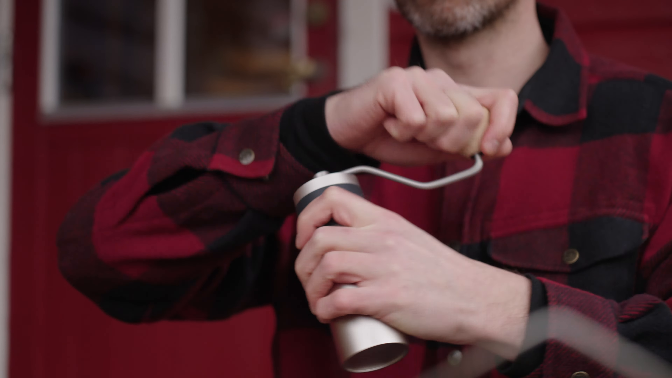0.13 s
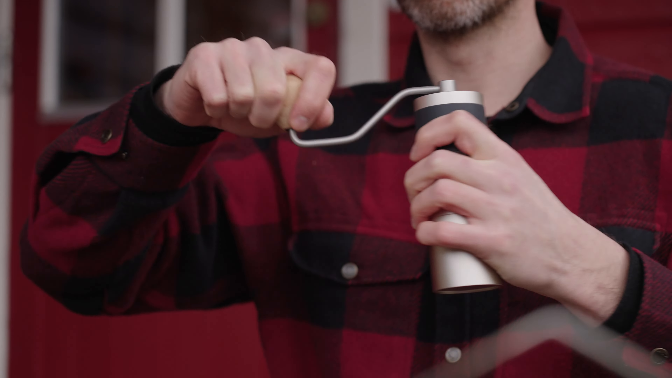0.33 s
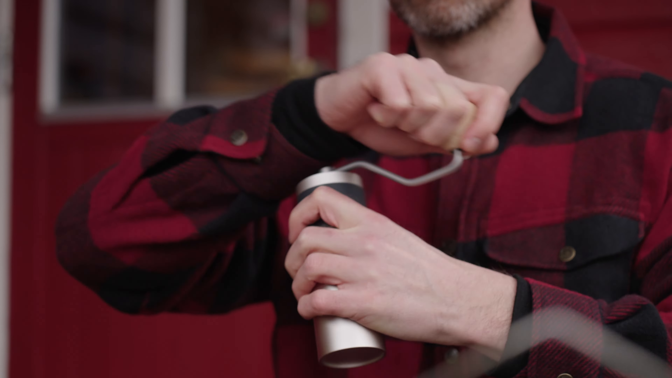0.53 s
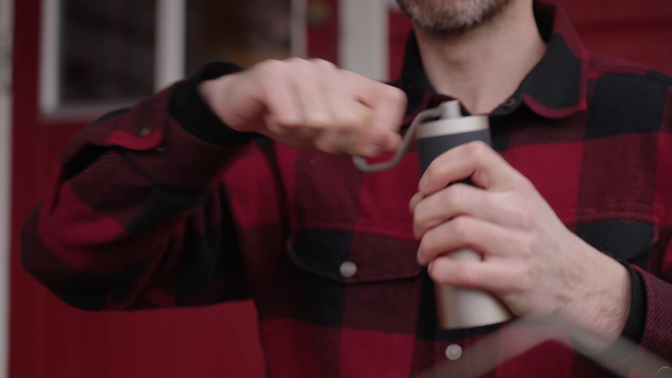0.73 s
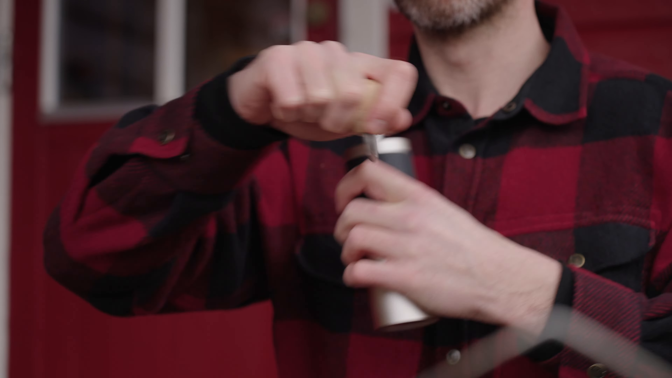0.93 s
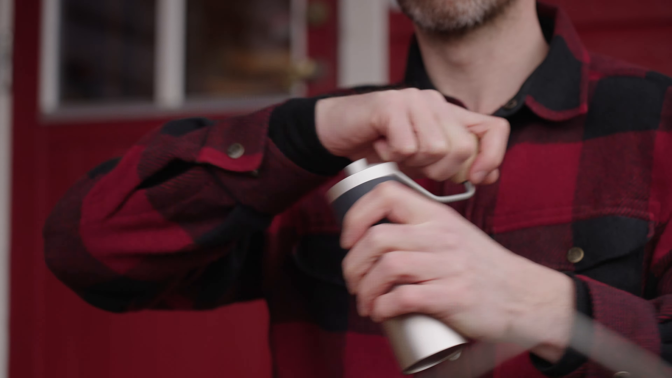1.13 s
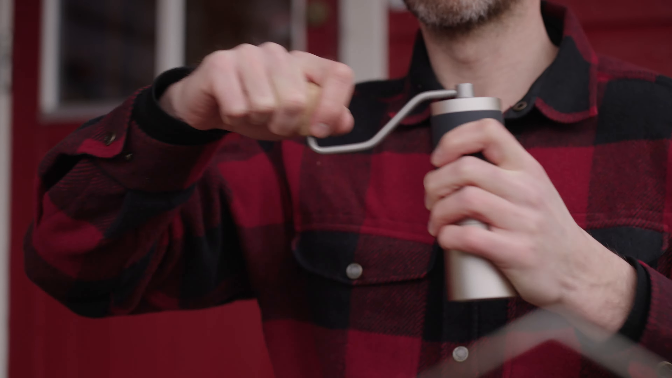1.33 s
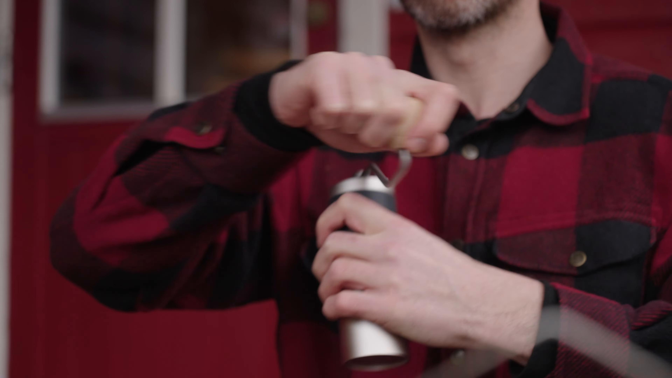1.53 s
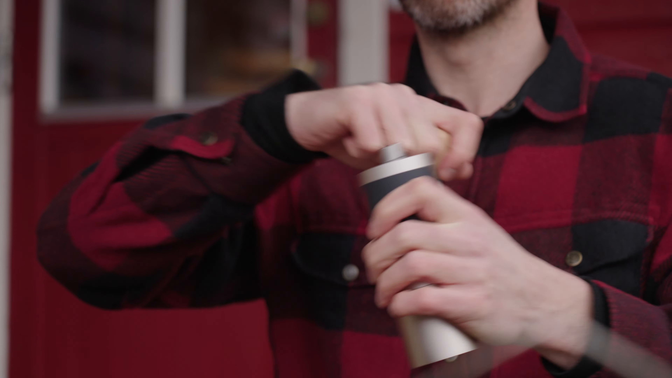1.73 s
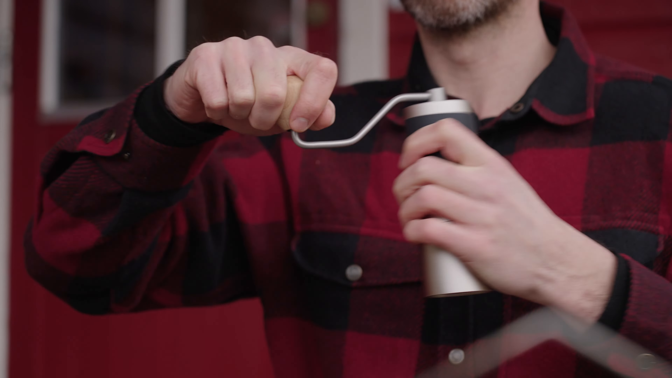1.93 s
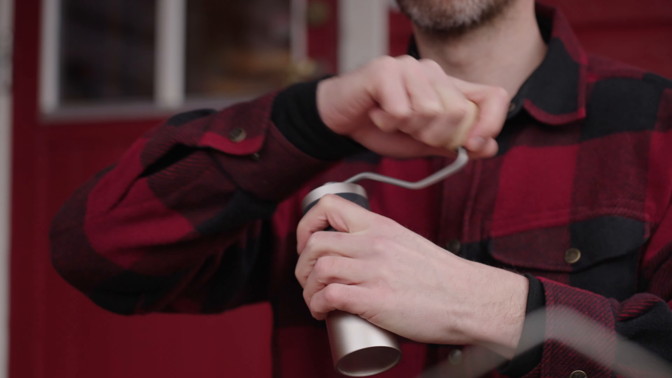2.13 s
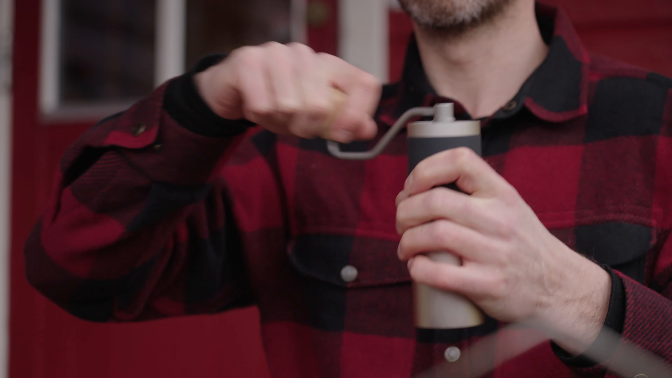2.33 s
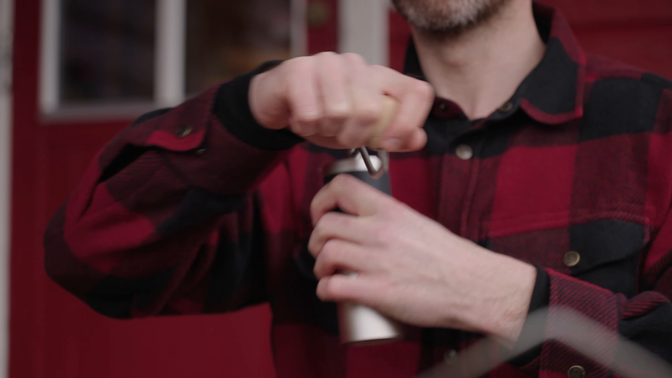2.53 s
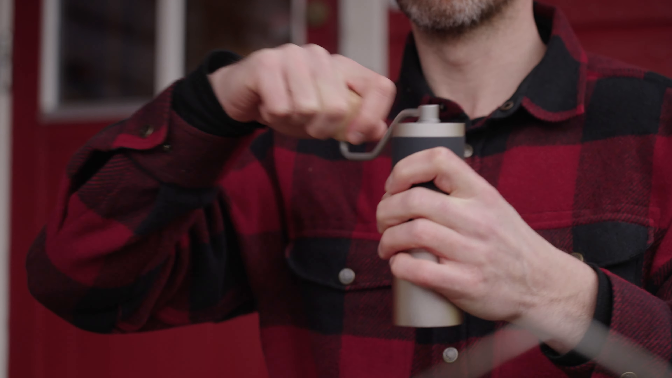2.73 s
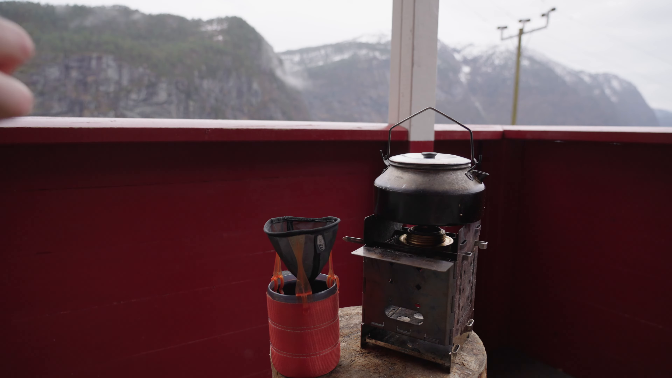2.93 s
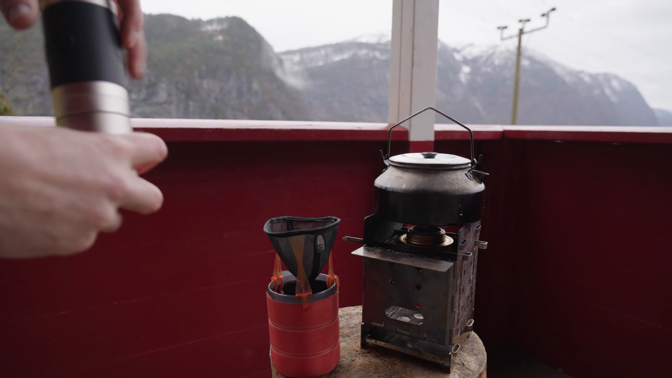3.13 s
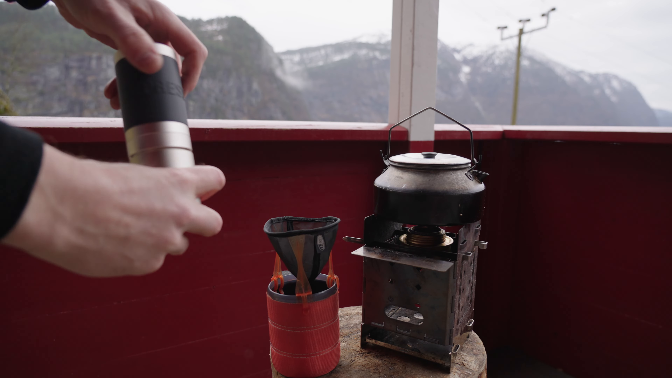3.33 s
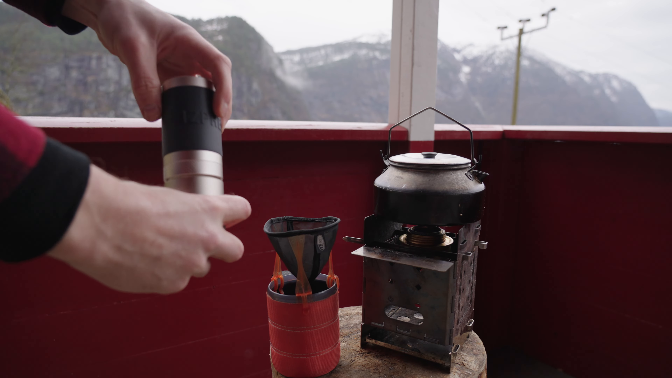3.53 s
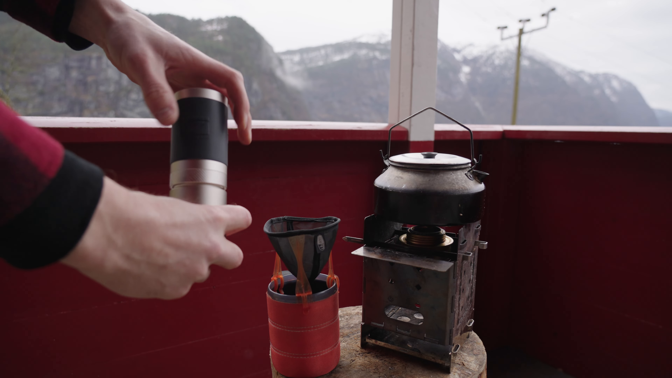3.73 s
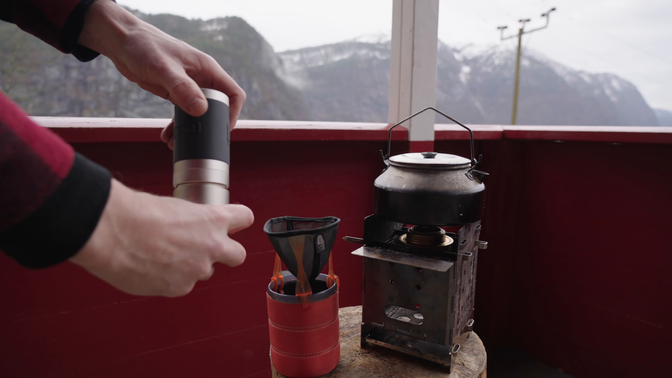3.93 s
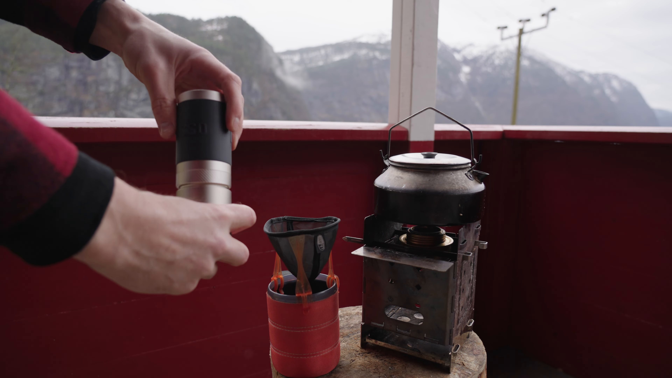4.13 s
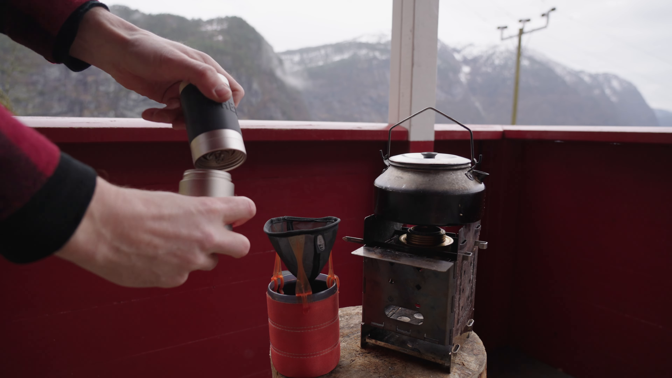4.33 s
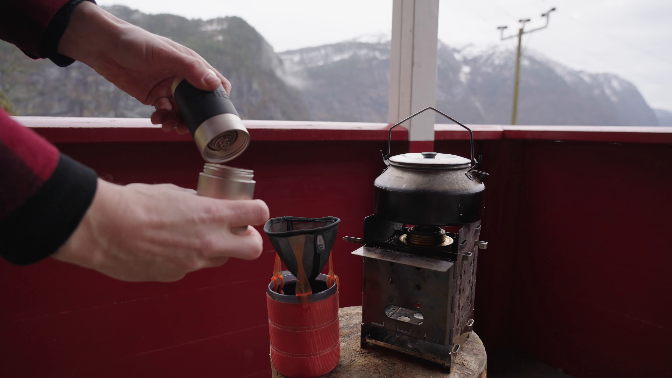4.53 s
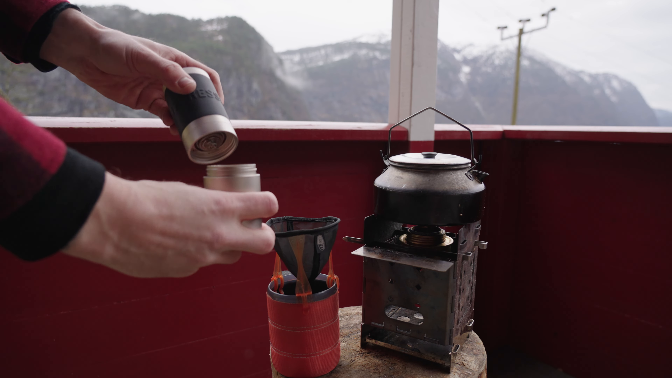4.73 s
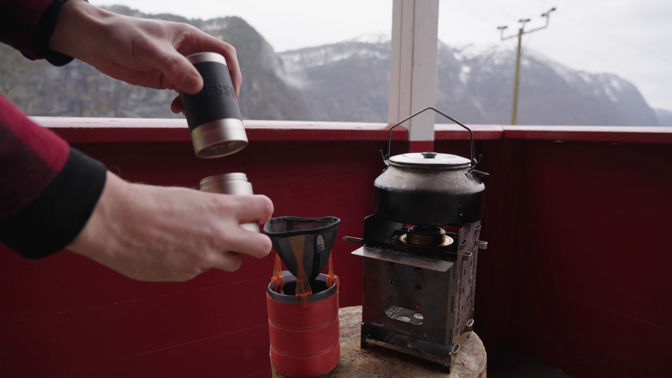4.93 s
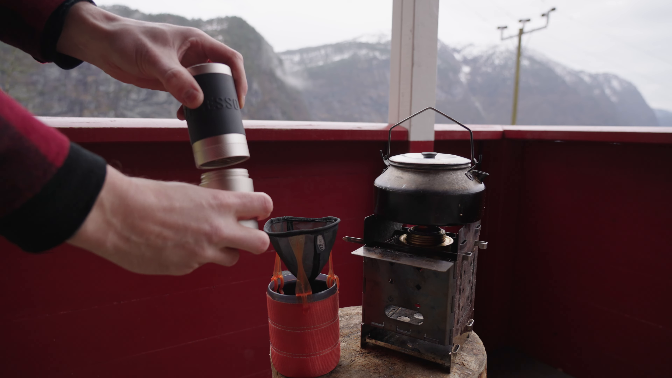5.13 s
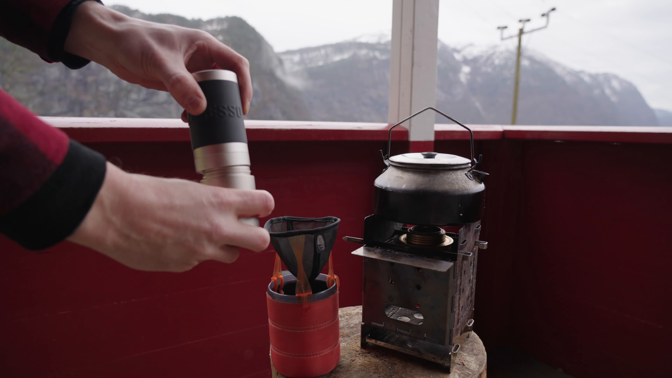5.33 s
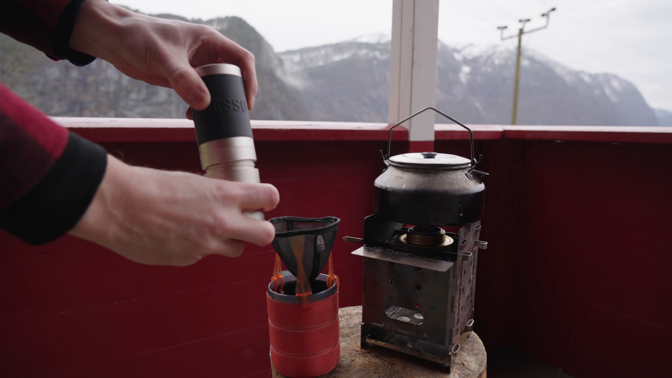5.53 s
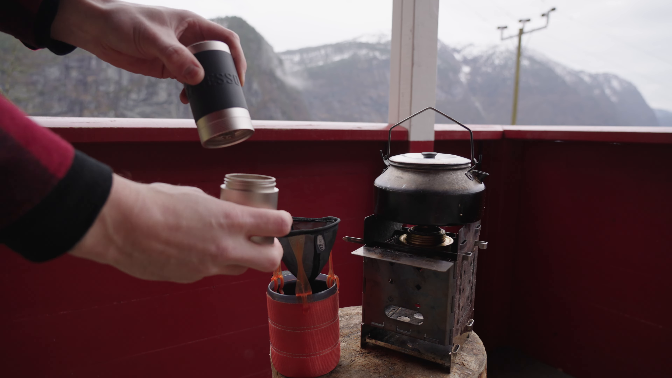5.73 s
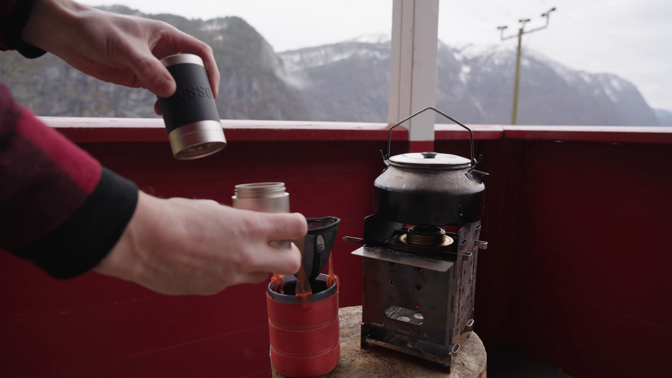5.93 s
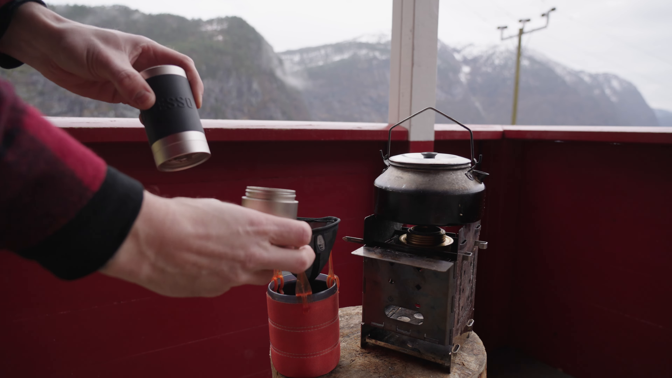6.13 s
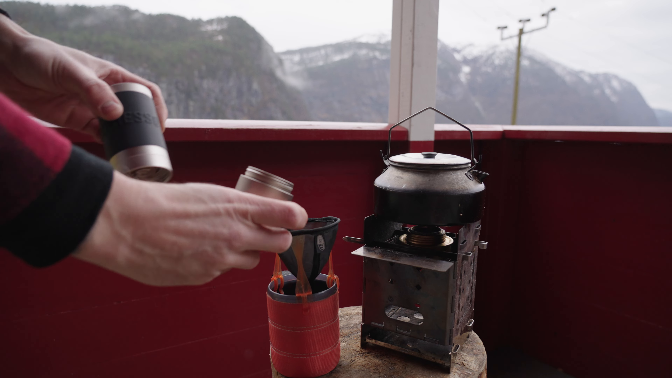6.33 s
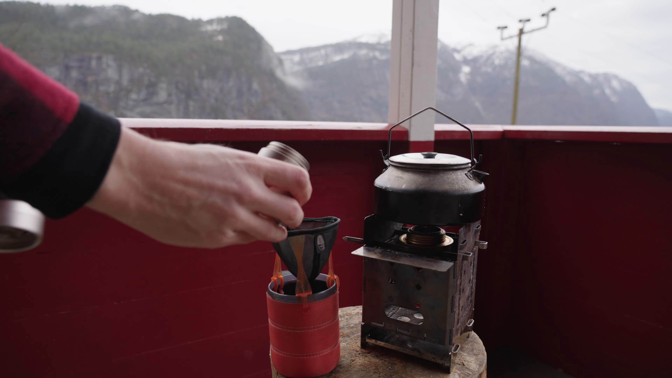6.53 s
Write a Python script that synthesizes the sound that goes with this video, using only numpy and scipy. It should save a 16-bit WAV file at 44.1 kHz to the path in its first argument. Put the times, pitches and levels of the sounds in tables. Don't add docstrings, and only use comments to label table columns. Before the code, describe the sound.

Crisp coffee beans splinter in a hand grinder, cut to ringing metallic thread squeaks, a few ticks, then sharp metal knocks over soft wind.

```python
import sys
import numpy as np
from scipy import signal
from scipy.fft import rfft, irfft
from scipy.io import wavfile
from scipy.ndimage import uniform_filter1d

SR = 44100
rng = np.random.default_rng(int(sys.argv[2]) if len(sys.argv) > 2 else 0)


def rack_gain(trim_db):
    fader = np.asarray(trim_db, float)
    return 10 ** (fader / 20)


def generate_wav(sig):
    pcm = np.round(np.clip(np.atleast_2d(sig).T, -1, 1) * 32767).astype(np.int16)
    wavfile.write(sys.argv[1], SR, pcm)


N = 295462
CHANGE_S = 2.887

# frequency in Hz, density in dB per Hz.
AIR_SPECTRUM = [(35, -25), (65, -16.5), (138, -1), (228, -7.5), (357, -5.5), (780, -10), (5000, -33),
                (16000, -45)]
# time in seconds, level in dB.
WIND = [
    (2.89, 2.5),
    (3.8, 1.5),
    (4.7, -1),
    (5.9, -1),
    (6.35, 0),
    (6.7, 0.5),
]
# time in seconds, level in dB.
MOTOR_HUM = [
    (0.0, -71.5),
    (.9, -63),
    (1.36, -72),
    (1.45, -64.5),
    (2.54, -60.5),
    (2.88, -71),
]

# start in seconds, held in seconds, load in dB, brittleness in dB.
BEANS = [(0, 0.013, -49, -6), (.05, 0.017, -50, 6.5), (.16, .03, -48.5, -1), (0.198, 0.11, -42.5, 0),
         (.33, 0.097, -48.5, 0.5), (.43, 0.035, -44, 2.5), (.52, 0.066, -46.5, 0), (.61, 0.097, -45, -2),
         (.74, .05, -52, 5), (.865, .03, -49, 7.5), (.915, 0.1, -44, 2.5), (1.07, 0.041, -49, 0.5),
         (1.22, 0.029, -50, 6), (1.325, 0.033, -52, -3), (1.52, 0.13, -49.5, -0.5), (1.74, 0.053, -52, 6),
         (1.845, 0.022, -56, 3), (2.01, .03, -63, 4), (2.16, 0.026, -57.5, 2), (2.25, 0.098, -55.5, -1),
         (2.385, 0.046, -66, 11.5), (2.51, 0.029, -55.5, 3), (2.575, .3, -46.5, 2)]
# level in dB against the load, share of brittleness, decay in dB per second.
SHAKEN_PARTS = [
    (-5.5, -0.33, 125),
    (-9, 0.42, 122),
    (-10, -0.12, 123),
    (-17, 1.1, 112),
]
# frequency in Hz, width in Hz, level in dB.
SHELL = [(835, 380, -18), (1076, 450, 12.5), (1340, 440, -6), (1480, 490, -0.5)]
# frequency in Hz, width in Hz, level in dB.
BURRS = [(2370, 147, 2.5), (2440, 550, 0), (3480, 300, -2), (4000, 400, 1)]
# frequency in Hz, width in Hz, level in dB.
TEETH = [(6050, 620, -5), (6200, 250, 2.5), (6540, 580, 0.5), (7200, 1530, -13.5)]
# frequency in Hz, width in Hz, level in dB.
CHIPS = [(8370, 840, 11.5), (10060, 570, 6.5), (11830, 1100, -8), (13940, 1800, -19)]
# time in seconds, peak in dB, shell part in dB against the peak.
CRACKS = [(0.054, -30.5, -13), (0.2034, -26, -17), (0.272, -38, -11), (0.437, -28, -17),
          (0.5296, -31.5, -14), (0.5555, -32, -12), (0.615, -29.5, -16), (0.6424, -23.5, -18),
          (0.6664, -32, -9), (0.703, -30, -13), (0.869, -32.5, -9), (0.9178, -24, -21),
          (0.9447, -23.5, -24), (1.0073, -29.5, -22), (1.229, -30, -28), (1.336, -27.5, -19),
          (1.409, -49, -16), (1.5239, -47, -10), (1.563, -31.5, -17), (1.5914, -34, -8.5),
          (1.697, -39.5, -4), (1.7488, -37, -3.5), (1.766, -34, -9), (1.8479, -35.5, -12),
          (2.0114, -39.5, -5.5), (2.2708, -32.5, -15), (2.5749, -21, -21), (2.6773, -37.5, -5),
          (2.82, -41, -2), (2.869, -30, -7.5)]
# time in seconds, peak in dB.
SPLINTERS = [(0.437, -39), (0.6315, -40), (0.6824, -37), (0.7847, -38), (0.9183, -37), (0.9438, -30.5),
             (1.0056, -39), (1.1149, -34), (1.175, -37.5), (1.22, -39), (1.328, -39), (1.4077, -36),
             (1.8692, -40), (2.0408, -50), (2.048, -34), (2.18, -41), (2.3935, -44), (2.4114, -44),
             (2.4464, -51), (2.4872, -64), (2.5446, -47), (2.7432, -51), (2.819, -41)]
# time in seconds, peak in dB.
FRAGMENTS = [(0.02, -40), (0.1149, -41), (0.1642, -46), (0.2136, -30.5), (0.2208, -35), (0.245, -42),
             (0.2659, -40), (0.2835, -39), (0.2965, -39), (0.3125, -39), (0.3241, -43), (0.3513, -44),
             (0.3704, -45), (0.4092, -47), (0.4522, -46), (0.4657, -39), (0.4787, -50), (0.487, -46),
             (0.4973, -40), (0.5041, -45), (0.5193, -45), (0.5731, -40), (0.584, -38), (0.631, -39),
             (0.683, -38), (0.6935, -43), (0.7834, -39), (0.9266, -43), (0.9567, -42), (0.9679, -39),
             (0.9852, -41), (0.9994, -46), (1.0439, -43), (1.1027, -43), (1.2666, -41), (1.2945, -44),
             (1.3287, -41), (1.4233, -47), (1.4349, -46), (1.529, -43), (1.5439, -44), (1.6085, -41),
             (1.82, -46), (1.863, -43), (1.876, -44), (2.1801, -42.5), (2.2494, -47), (2.3244, -45),
             (2.3512, -45), (2.5967, -43), (2.6121, -39), (2.6277, -43), (2.6634, -48), (2.692, -38),
             (2.7116, -46), (2.72, -47), (2.7316, -47), (2.7444, -42), (2.7774, -45), (2.8259, -47)]
# start in seconds, held in seconds, pitch in Hz, level
# in dB.
GROANS = [(.055, 0.018, 2400, -51), (.17, 0.028, 980, -55), (.203, 0.022, 1520, -48),
          (.21, 0.037, 2310, -46), (.27, .025, 1140, -53), (.32, .02, 1150, -50.5), (.44, 0.055, 2280, -56),
          (.525, .08, 950, -49), (.63, 0.077, 1100, -52.5), (.635, .015, 4120, -51), (.66, .025, 4050, -50),
          (.79, .055, 2280, -64), (.91, .05, 1460, -50), (.97, .04, 1080, -53), (1.04, .045, 900, -50.5),
          (1.24, .045, 3500, -61.5), (1.409, 0.014, 8800, -50), (1.42, 0.077, 2580, -60),
          (1.476, 0.011, 8800, -57), (1.6, .06, 4000, -61), (2.012, 0.013, 2400, -52.5),
          (2.577, 0.015, 2020, -50), (2.68, 0.018, 1190, -52), (2.745, .015, 2370, -52),
          (2.94, .14, 7800, -64), (3.03, .03, 7300, -60), (3.285, 0.025, 1440, -51.5),
          (3.3, 0.11, 2090, -57), (3.585, .012, 1800, -54), (3.62, .06, 2080, -59),
          (4.045, .035, 8800, -68), (4.205, 0.03, 7300, -57), (4.275, 0.026, 7770, -59),
          (4.3, 0.021, 4540, -54)]
# start in seconds, held in seconds, upper ring in dB, lower ring in dB.
HANDLE_RUBS = [
    (1.409, 0.062, -55.5, -58.5),
    (1.864, 0.021, -65, -57),
    (2.043, 0.013, -55, -58),
]

# start in seconds, held in seconds, ring in dB,
# upper modes in dB against their rule, low scrape in dB.
PUSHES = [(2.9, 0.071, -58.5, -2, -53), (2.99, 0.016, -45, -7, -47), (3.025, 0.062, -41.5, -1, -48.5),
          (3.31, 0.041, -36, 1, -47.5), (3.365, 0.038, -41, 1, -53), (3.6, 0.036, -40, 0.5, -49.5),
          (3.638, 0.029, -38.5, -0.5, -46.5), (3.895, 0.031, -42, -2, -50), (3.935, 0.034, -40, -4, -54),
          (4.213, 0.02, -40.5, -3.5, -54), (4.25, 0.018, -46, -7, -60), (4.283, 0.015, -43.5, -6, -57)]
# time in seconds, ring in dB.
SLIPS = [(2.9232, -52.5), (2.9309, -53), (2.9366, -47.5), (2.9463, -56), (2.9547, -51), (2.971, -50),
         (2.9837, -39), (2.9952, -32.5), (3.02, -38), (3.03, -31), (3.0419, -38), (3.0629, -35),
         (3.0766, -34), (3.1097, -58), (3.2927, -49), (3.3085, -36), (3.3177, -32), (3.327, -32),
         (3.3334, -29.5), (3.3434, -33), (3.3526, -38), (3.3596, -33), (3.3728, -37), (3.3858, -37),
         (3.3941, -38), (3.4016, -39), (3.4399, -58), (3.5606, -57), (3.5827, -46), (3.5982, -42),
         (3.6045, -37), (3.6137, -35), (3.6377, -32), (3.6503, -29), (3.6643, -36), (3.6732, -46),
         (3.6802, -50), (3.6871, -50), (3.8062, -56), (3.8377, -60), (3.8719, -51), (3.8999, -39),
         (3.9156, -40), (3.9244, -35), (3.9375, -31.5), (3.9485, -31), (3.9637, -38), (3.981, -49),
         (3.9899, -50), (4.0062, -54), (4.1951, -45), (4.2003, -48), (4.2195, -38.5), (4.2283, -43),
         (4.2359, -41), (4.2564, -35.5), (4.2641, -41), (4.2701, -42), (4.2852, -35), (4.3006, -37.5)]
# time in seconds, frequency in Hz.
GRIP_PITCH = [
    [(2.89, 5300), (2.96, 4830), (3.0, 4800), (3.06, 4660), (3.11, 5000)],
    [(3.28, 5250), (3.33, 4980), (3.37, 5130), (3.42, 5350)],
    [(3.56, 5400), (3.61, 5000), (3.65, 5060), (3.69, 5000)],
    [(3.86, 5250), (3.91, 4900), (3.95, 4800), (4.01, 4680)],
    [(4.17, 5300), (4.2, 5100), (4.23, 4800), (4.29, 4660), (4.33, 4500)],
]
CUP_WALL_HZ = [4490, 4690, 4800, 4970, 5056, 5240, 5440, 5840]
# frequency in Hz, width in Hz, level in dB.
CUP_HIGH = [(7300, 95, 7.5), (7750, 95, 3), (9100, 910, -5), (11600, 580, -13), (12200, 400, -15),
            (5840, 630, -13)]
# frequency in Hz, width in Hz, level in dB.
CUP_LOW = [(1100, 200, 4), (1710, 300, 1), (2140, 170, 1), (3260, 900, -7.5)]
# time in seconds, peak in dB, bright part in dB.
TICKS = [
    (2.992, -26.5, -40),
    (3.027, -36, -30),
    (3.288, -54, -31),
    (3.587, -39, -40),
    (3.805, -43, -54),
    (3.837, -41, -54),
    (3.946, -20.5, -33),
    (4.0067, -36, -55),
    (4.284, -41, -43),
]
# frequency in Hz, level in dB, decay time T60 in seconds.
CATCH_MODES = [(442, -7, 0.024), (590, -6, 0.022), (757, 0.5, 0.023), (1040, 5.0, 0.023),
               (1445, 2.0, 0.014), (1850, -0.5, 0.012), (2400, -11.0, 0.015)]
# time in seconds, peak in dB.
REGRIPS = [
    (3.1444, -61),
    (3.2266, -70),
    (3.2715, -66),
    (3.475, -63),
    (3.7794, -64),
    (3.8342, -63),
]
# middle in seconds, held in seconds, pitch in Hz, glide in Hz per second,
# level in dB.
SLIDES = [
    (3.088, 0.031, 1854, 800, -54.5),
    (3.33, 0.057, 2140, -2900, -57),
    (3.68, 0.0077, 1100, -2000, -53.5),
    (3.977, 0.013, 1737, -7000, -48.5),
    (4.277, .035, 808, -5500, -57),
]

# time in seconds, wall in dB, cup ring in dB, thud in dB, rim in dB.
KNOCKS = [(5.2497, -15.5, -23.5, -28, -55), (5.3601, -16.5, -22, -26, -44.5),
          (5.3656, -24.5, -50, -36, -58), (5.4609, -8, -17.5, -20.5, -31), (5.4656, -15, -21, -34, -35),
          (5.493, -10, -9.5, -26, -39), (5.4984, -21, -8.5, -32, -36), (5.5039, -29, -34.5, -31.5, -40.5),
          (5.543, -44, -43, -39, -64), (5.5738, -20, -37, -29, -50), (5.578, -22, -28.5, -27.5, -50),
          (5.585, -36, -34.5, -38, -50), (5.6085, -46, -56, -61, -66)]
# frequency in Hz, width in Hz, level in dB.
WALLS = [(1580, 480, -2), (1920, 460, 4), (2175, 230, 4.5), (2470, 330, -1), (3026, 280, 2),
         (3620, 370, -2.5)]
# frequency in Hz, level in dB, decay time T60 in seconds.
CUP_RING = [(4535, -0.5, 0.07), (4700, -13, 0.022), (4840, -15.5, 0.019)]
# frequency in Hz, level in dB, decay time T60 in seconds.
SEATED_RING = [(4600, -1, 0.092), (4700, -2, 0.035), (5200, -15, 0.027)]
# frequency in Hz, level in dB, decay time T60 in seconds.
RIM_LOW = [(5460, -7, 0.04), (5720, -11, 0.035)]
# frequency in Hz, level in dB, decay time T60 in seconds.
RIM_HIGH = [(7250, -9.5, 0.0483), (7680, -0.5, 0.03), (8800, -12, .012), (11900, -9.5, 0.012),
            (12600, -18, .012)]
# frequency in Hz, level in dB, decay time T60 in seconds.
THUD = [(240, -13, 0.036), (505, -23.5, .04), (583, -3, 0.054), (732, -8, 0.083), (950, 1.5, 0.027),
        (1068, 8.5, 0.03), (1175, 4.5, 0.03)]
# frequency in Hz, level in dB, decay time T60 in seconds.
DEEP_THUD = [(519, -13, 0.072), (643, -5, 0.049), (810, 0.5, 0.056)]
# start in seconds, held in seconds, depth in dB.
MUTES = [
    (5.272, 0.075, 9.5),
    (5.378, 0.084, 19),
    (5.478, .014, 7.5),
    (5.551, 0.024, 13),
]
# middle in seconds, held in seconds, pitch in Hz, glide in Hz per second, level in dB.
BIRD_NOTES = [
    (5.285, .01, 8050, 30000, -69),
    (5.305, 0.014, 8300, -20000, -63),
    (5.335, .015, 8300, 8000, -72),
    (5.925, .02, 7350, 6000, -78),
    (6.025, .02, 7150, -1000, -79),
]


def in_time(rows, rest=None):
    s, *columns = np.transpose(rows)
    return [np.interp(np.arange(N) / SR, s, c, rest, rest) for c in columns]


def rms_one(x):
    return x / np.sqrt(np.mean(x ** 2) + 1e-20)


def butter(x, hz, kind, order=2):
    return signal.sosfilt(signal.butter(order, hz, kind, fs=SR, output="sos"), x)


def drift(hz):
    settle = 3000
    slow = butter(rng.standard_normal(N // 16 + settle + 2), 16 * hz, "low")[settle:]
    return np.interp(np.arange(N) / 16, np.arange(len(slow)), rms_one(slow))


def grains(per_s, spread_db, clump_db, clump_hz):
    size_db = spread_db * np.minimum(rng.exponential(1, N), 4)
    sizes = rack_gain(size_db + clump_db * drift(clump_hz).clip(-3, 1.6))
    clicks = sizes * rng.choice([-1, 1], N) * (rng.random(N) < per_s / SR)
    return clicks / np.sqrt(uniform_filter1d(clicks ** 2, size=SR // 20) + 1e-6)


def resonate(x, peaks, wander_db=0, wander_hz=8):
    out, power = 0, 0
    for k, (hz, width, level_db) in enumerate(peaks):
        r = np.exp(-np.pi * width / SR)
        share = rack_gain(wander_db * drift(wander_hz)) if wander_db else 1
        poles = [1, -2 * r * np.cos(2 * np.pi * hz / SR), r * r]
        ring = signal.lfilter([1 - r, 0, r - 1], poles, x + 1e-18)
        out = out + (-1) ** k * rack_gain(level_db) * share * ring
        power = power + share ** 2 / len(peaks)
    return out / np.sqrt(power)


def impulses(times, level_db):
    clicks = np.full(N, 1e-18)
    clicks[np.round(times * SR).astype(int)] = rack_gain(level_db)
    return clicks


def bursts(times, level_db, decay_s):
    envelope = signal.lfilter([1], [1, -np.exp(-1 / (decay_s * SR))], impulses(times, level_db))
    return envelope * rng.choice([-1, 1], N)


def strike(times, level_db, modes, luck_db=7.5):
    out, luck = 0, rng.standard_normal((len(times), len(modes))) * luck_db
    for k, (hz, mode_db, t60) in enumerate(modes):
        clicks = impulses(times, level_db + mode_db + luck[:, k])
        r, w = rack_gain(-60 / (t60 * SR)), 2 * np.pi * hz / SR
        out = out + signal.lfilter([0, np.sin(w)], [1, -2 * r * np.cos(w), r * r], clicks)
    return out


def swell(s, held, level_db, rise, fall):
    t = np.arange(0, N + 32, 32) / SR - np.reshape(s, (-1, 1))
    after = (t - np.reshape(held, (-1, 1))).clip(0)
    db = np.reshape(level_db, (-1, 1)) + rise * t.clip(None, 0) - fall * after
    return np.interp(np.arange(N) / 32, np.arange(t.shape[1]), db.max(axis=0).clip(-160))


def glide(notes, edge_db_per_s):
    s, held, hz, slope, level_db = np.transpose(notes)
    t = np.arange(N) / SR
    near = np.searchsorted((s[1:] + s[:-1]) / 2, t)
    pitch = hz[near] + slope[near] * (t - s[near]).clip(-.04, .04)
    return pitch, rack_gain(swell(s - held / 2, held, level_db, edge_db_per_s, edge_db_per_s))


def porch(x):
    t60_s, wash_db = 0.19, -9.5
    t = np.arange(int(.25 * SR)) / SR
    echo = rng.standard_normal(len(t)) * rack_gain(-60 * t / t60_s) * (t > .003)
    echo = butter(echo / np.sqrt(np.sum(echo ** 2)), 7490, "low", order=1)
    return x + rack_gain(wash_db) * signal.fftconvolve(x, echo)[:N]


def air():
    after = (np.arange(N) >= CHANGE_S * SR).astype(int)
    gust_db = in_time(WIND, 0)[0]
    low_db = np.take((-53.5, -56), after) + 0.23 * gust_db
    high_db = np.take((-50, -52), after) + gust_db
    buffet = rms_one(butter(rng.standard_normal(N), [25, 60], "band"))
    puff = rack_gain(swell(2.89, .25, -72, 900, 40)) * buffet
    hz = np.fft.rfftfreq(N, 1 / SR) + 1
    corner_hz, density_db = np.transpose(AIR_SPECTRUM)
    shape = rack_gain(np.interp(np.log(hz), np.log(corner_hz), density_db))
    hiss = irfft(rfft(rng.standard_normal(N)) * shape, N)
    low, high = butter(hiss, 1800, "low", order=1), butter(hiss, 1340, "high", order=1)
    return (rack_gain(low_db) * low + rack_gain(high_db) * high) / np.std(hiss) + puff


def hum():
    hz = 260.7 + 1.28 * drift(3.3)
    return rack_gain(in_time(MOTOR_HUM, -140)[0] + 3.0) * np.sin(2 * np.pi * np.cumsum(hz) / SR)


def grinding():
    bite_db_per_s, idle_db = 900, -65.5
    s, held, load_db, brittle_db = np.transpose(BEANS)
    gains = []
    for db, share, fall in SHAKEN_PARTS:
        load = rack_gain(swell(s, held, load_db + share * brittle_db, bite_db_per_s, fall))
        gains.append(rack_gain(db) * (rack_gain(idle_db) + load))
    shell, burr, teeth, fizz = gains
    crush = grains(2600, spread_db=3.0, clump_db=2.5, clump_hz=61.0)
    chips = grains(3000, spread_db=5.5, clump_db=4.5, clump_hz=70.4)
    both = crush + 0.28 * chips
    shell_ring = resonate(crush, SHELL, wander_db=1.5)
    burr_ring = resonate(both, BURRS, wander_db=2.5, wander_hz=12.5)
    teeth_ring = resonate(both, TEETH, wander_db=1.5)
    chip_ring = resonate(chips + 0.7 * crush, CHIPS, wander_db=-4.0)
    out = shell * rms_one(shell_ring + 0.22 * butter(crush, [500, 2200], "band"))
    out += burr * rms_one(burr_ring + 0.46 * butter(both, [1800, 5000], "band"))
    out += teeth * rms_one(teeth_ring + 0.11 * butter(both, [4400, 8000], "band"))
    out += fizz * rms_one(butter(chip_ring, 7000, "high"))
    sparse = np.abs(grains(90, spread_db=1.0, clump_db=2.0, clump_hz=19))
    crackle = signal.lfilter([1], [1, -.97], sparse) * rng.choice([-1, 1], N)
    crackle = butter(crackle, [1200, 8000], "band") + 1.9 * resonate(crackle, BURRS + TEETH)
    return out + rack_gain(-9.5) * burr * rms_one(crackle)


def cracking():
    s, peak_db, low_db = np.transpose(CRACKS)
    snap = bursts(s, peak_db - 3.0, decay_s=0.0023) + bursts(s, peak_db - 4.5, decay_s=0.00034)
    out = 0.54 * butter(snap, [2800, 9500], "band") + 1.53 * resonate(snap, BURRS + TEETH)
    out += resonate(bursts(s, peak_db + low_db, decay_s=0.0049), SHELL + BURRS[:1])
    s, peak_db = np.transpose(SPLINTERS)
    return out + butter(bursts(s, peak_db - 3.0, decay_s=0.002), [7500, 14500], "band")


def fragments():
    s, peak_db = np.transpose(FRAGMENTS)
    snap = bursts(s, peak_db + 3.0, decay_s=.0015) + bursts(s, peak_db + 4.5, decay_s=0.00031)
    return 0.58 * butter(snap, [1500, 9000], "band") + 1.45 * resonate(snap, BURRS + TEETH)


def groans():
    width_hz, sag_db_per_s, fall_db_per_s = 210, 90, 700
    out, t = np.zeros(N), np.arange(SR // 5) / SR
    rubs = rng.standard_normal((len(GROANS), len(t))) ** 3
    r = np.exp(-np.pi * width_hz / SR)
    for (s, held, hz, level_db), rub in zip(GROANS, rubs):
        mode = [1, 0, -1, 1, -2 * r * np.cos(2 * np.pi * hz / SR), r * r]
        gain = rack_gain(level_db - sag_db_per_s * t - fall_db_per_s * (t - held).clip(0))
        start = int(s * SR)
        out[start:start + len(t)] += gain * rms_one(signal.sosfilt([mode, mode], rub))
    return out


def squeak():
    rub = grains(2500, spread_db=4.0, clump_db=7.5, clump_hz=50)
    s, held, upper_db, lower_db = np.transpose(HANDLE_RUBS)
    out = 0
    for db, hz, width_hz in [(upper_db, 8700, 650), (lower_db, 5430, 340)]:
        gain = rack_gain(swell(s, held, db, 1500, 400))
        out = out + gain * rms_one(resonate(rub, [(hz, width_hz, 0)]))
    return out


def thread():
    rise, fall = 798, 900
    s, held, push_db, upper_db, rub_db = np.transpose(PUSHES)
    ring_db = swell(s, held, push_db, rise, fall)
    low_db = swell(s, held, rub_db, rise, fall)
    high_db = swell(s, held, -55.5 + 1.3 * (push_db + 42) + upper_db, rise, fall)

    grip_hz, = in_time(np.concatenate(GRIP_PITCH))
    scrape = grains(8000, spread_db=2.5, clump_db=0.3, clump_hz=110)
    ring, total = 0, 1e-9
    for k, mode_hz in enumerate(CUP_WALL_HZ):
        share = rack_gain(-5.0 * np.abs(mode_hz - grip_hz) / 150 + 3.9 * drift(43))
        ring = ring + share * (-1) ** k * rms_one(resonate(scrape, [(mode_hz, 55, 0)]))
        total = total + share ** 2
    ring = ring / np.sqrt(total)
    ring = ring / np.sqrt(uniform_filter1d(ring ** 2, size=SR // 250) + .05)

    rim_air = rack_gain(-24.5) * rms_one(butter(scrape, [11330, 12600], "band"))
    broad = .26 * rms_one(butter(scrape, [4000, 6600], "band")) + rim_air
    high = resonate(scrape, CUP_HIGH, wander_db=3.5, wander_hz=9.0)
    high = rms_one(butter(high, [5500, 14500], "band"))
    rub = grains(3000, spread_db=1.0, clump_db=2.0, clump_hz=40.2)
    low = rms_one(resonate(rub, CUP_LOW, wander_db=6.0, wander_hz=18))

    slip_s, slip_db = np.transpose(SLIPS)
    slips = rack_gain(swell(slip_s, .0015, slip_db - 3.0, 2500, 1800))
    creep = rack_gain(swell(s, held, push_db - 31, 200, 200))
    gain = np.maximum(rack_gain(ring_db - 4.5), slips) + creep
    ring = butter(gain * rms_one(ring), [4300, 6100], "band")
    out = ring + rack_gain(ring_db) * broad + rack_gain(high_db) * high + rack_gain(low_db - 3.5) * low
    return (np.arange(N) >= CHANGE_S * SR) * out


def ticks():
    s, peak_db, high_db = np.transpose(TICKS)
    out = butter(strike(s, peak_db - 12.0, CATCH_MODES, luck_db=2.0), 360, "high")
    out = out + butter(bursts(s, high_db - 21, decay_s=.0012), [3000, 9000], "band")
    s, peak_db = np.transpose(REGRIPS)
    return out + resonate(bursts(s, peak_db + 9.0, decay_s=0.012), [(8860, 315, 0.26), (5400, 250, 1.7)])


def slide():
    hz, gain = glide(SLIDES, 800)
    rub = butter(rng.standard_normal(N) + 1j * rng.standard_normal(N), 58, "low")
    carrier = np.exp(2j * np.pi * np.cumsum(hz) / SR)
    return gain * rms_one((rub * carrier).real)


def knocks():
    s, wall_db, ring_db, thud_db, rim_db = np.transpose(KNOCKS)
    low_db, high_db = rim_db + 6, rim_db - 5.0
    crack = butter(bursts(s, high_db + 9, decay_s=0.0013), [5000, 12000], "band", order=3)
    crack += butter(bursts(s, wall_db - 9.5, decay_s=0.0011), [120, 5500], "band", order=3)
    rattle = bursts(s, wall_db - 6, decay_s=0.0025) + bursts(s, wall_db - 17.5, decay_s=0.013)
    walls = resonate(rattle, WALLS)
    rings = strike(s, ring_db - 5.0, CUP_RING, luck_db=4.0)
    rings = rings + strike(s[-4:], ring_db[-4:], SEATED_RING, luck_db=1.5)
    rings = butter(rings, [3800, 5500], "band")
    rim = strike(s, low_db + 4.5, RIM_LOW, luck_db=4.5) + strike(s, high_db + 4.5, RIM_HIGH, luck_db=-1.5)
    rings += butter(rim, [4500, 13000], "band")
    thud = strike(s, thud_db - 11.5, THUD, luck_db=3.5) + bursts(s, thud_db + 2.5, decay_s=0.0063)
    thud += strike(s[3:], thud_db[3:] - 15.0, DEEP_THUD, luck_db=6.5)
    mute_db = swell(*np.transpose(MUTES), 1298, 1e5).clip(0)
    rings *= rack_gain(1.0 - mute_db)
    return porch(crack + walls + butter(thud, [520, 1800], "band") + 0.47 * rings) + 0.51 * rings


def bird():
    hz, gain = glide(BIRD_NOTES, 1100)
    flutter = rack_gain(3.5 * drift(200))
    return gain * flutter * np.sin(2 * np.pi * np.cumsum(hz * (1 + .006 * drift(150))) / SR)


def scene():
    first = porch(grinding() + cracking() + squeak()) * (np.arange(N) < CHANGE_S * SR)
    twist = thread()
    second = 0.61 * twist + porch(0.31 * twist + slide() + ticks()) + knocks()
    background = air() + bird() + hum()
    return (first + second + background + porch(fragments() + groans()))[None]


def top_cut(x):
    return signal.sosfilt(signal.butter(12, 16580, fs=SR, output="sos"), x)


def record(dry):
    mix = signal.sosfilt(signal.cheby2(16, 50, 16050, fs=SR, output="sos"), dry)
    return top_cut(mix)


dry = scene()
out = record(dry)
generate_wav(out)
```